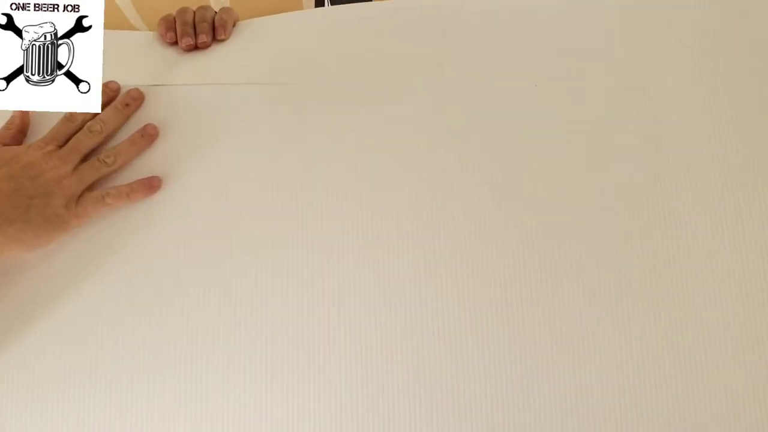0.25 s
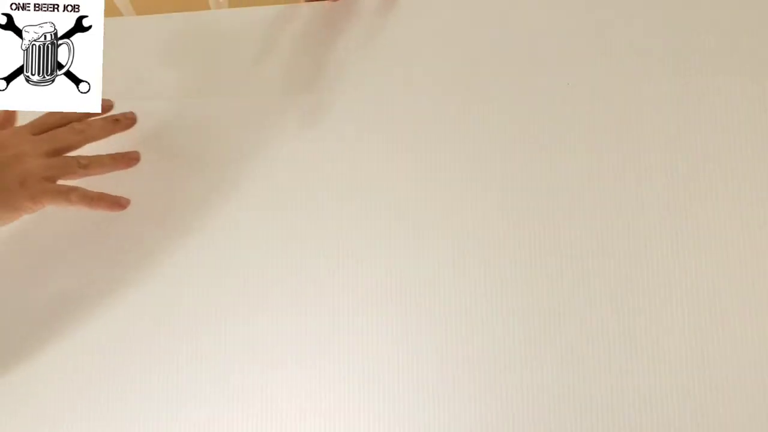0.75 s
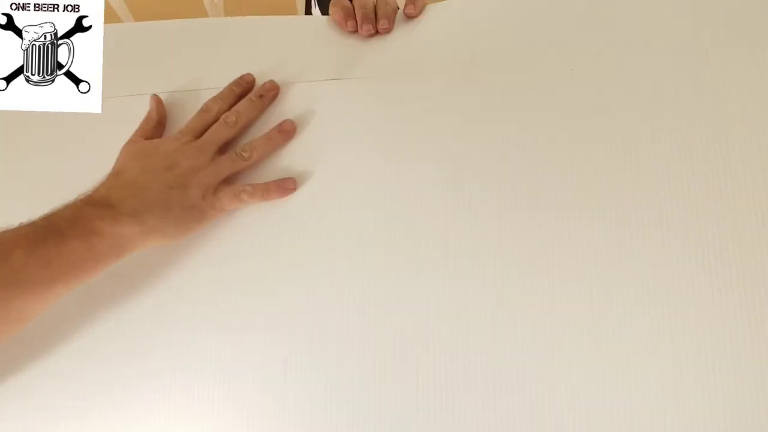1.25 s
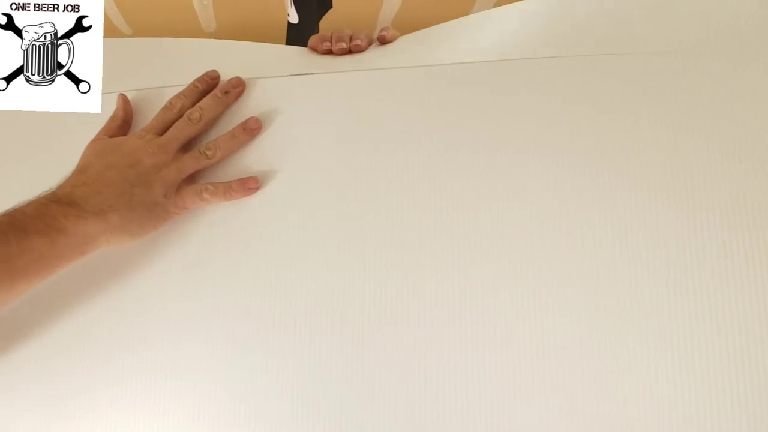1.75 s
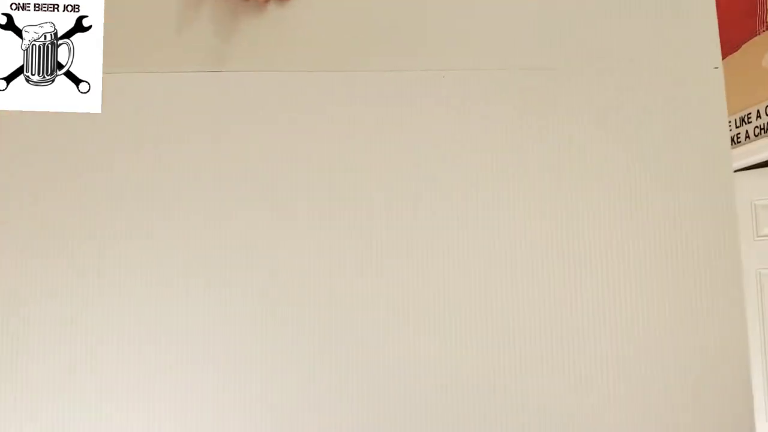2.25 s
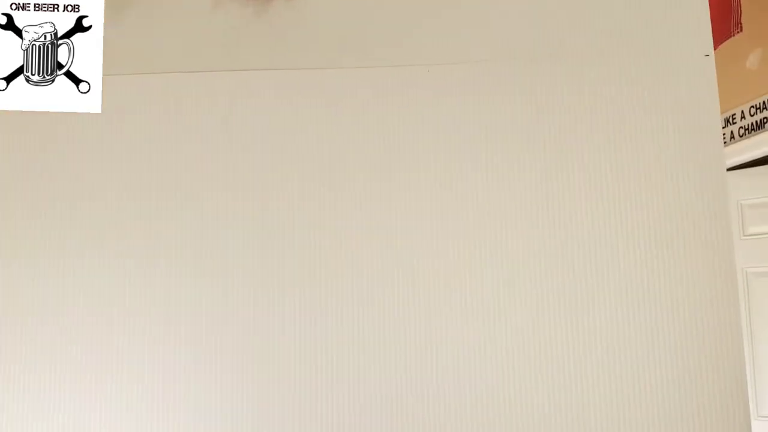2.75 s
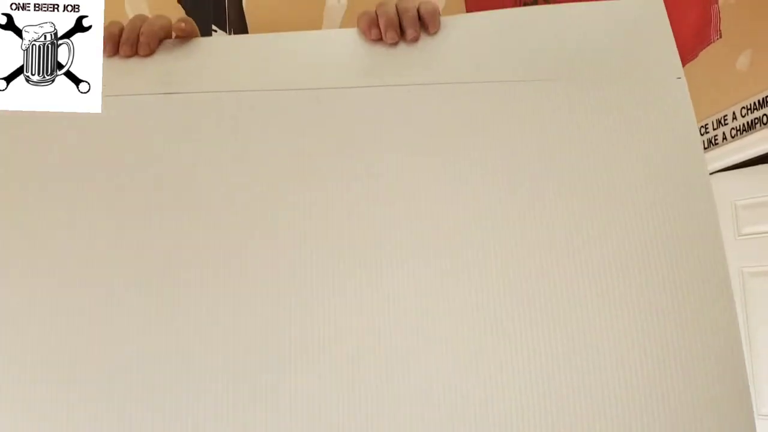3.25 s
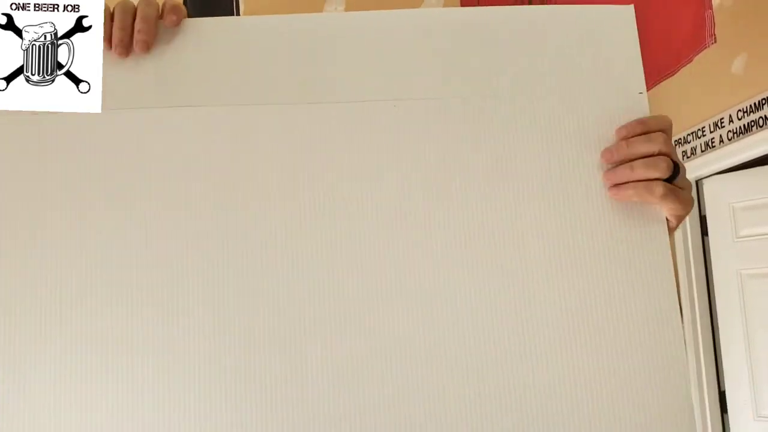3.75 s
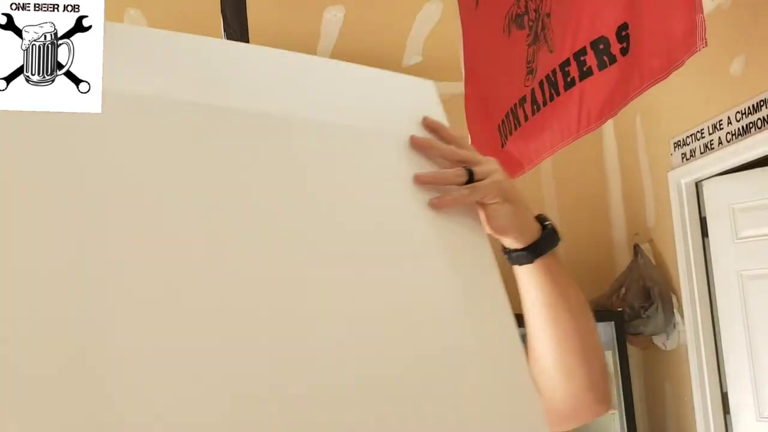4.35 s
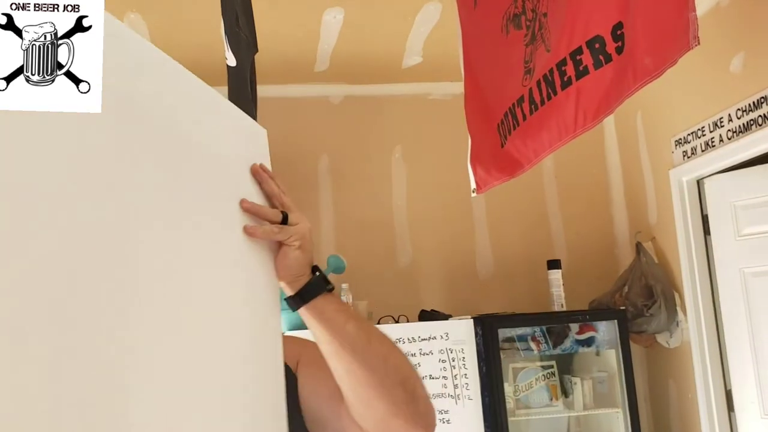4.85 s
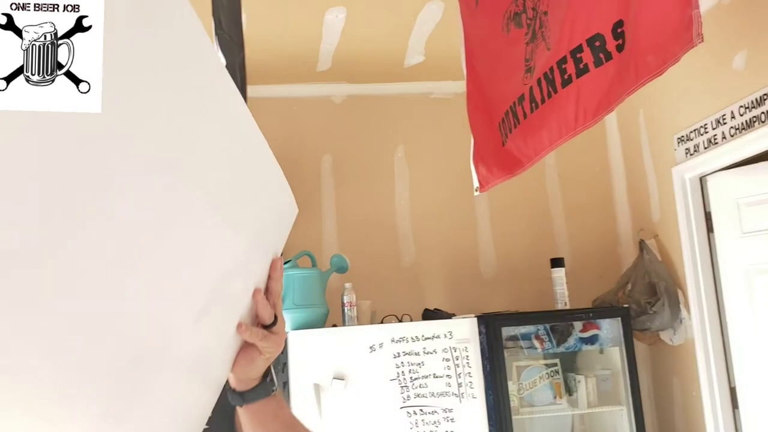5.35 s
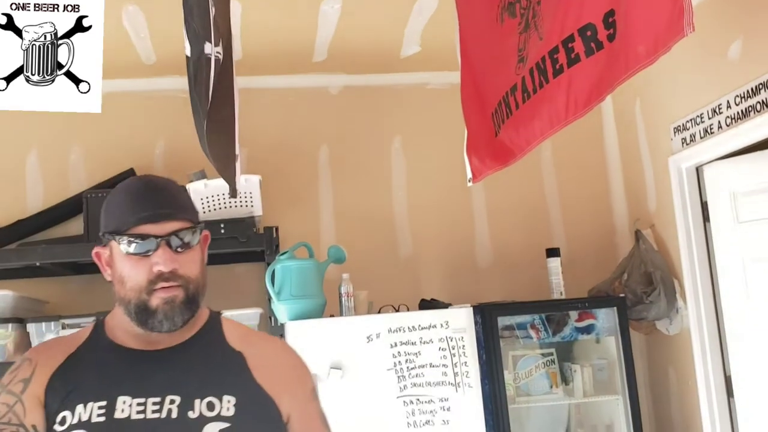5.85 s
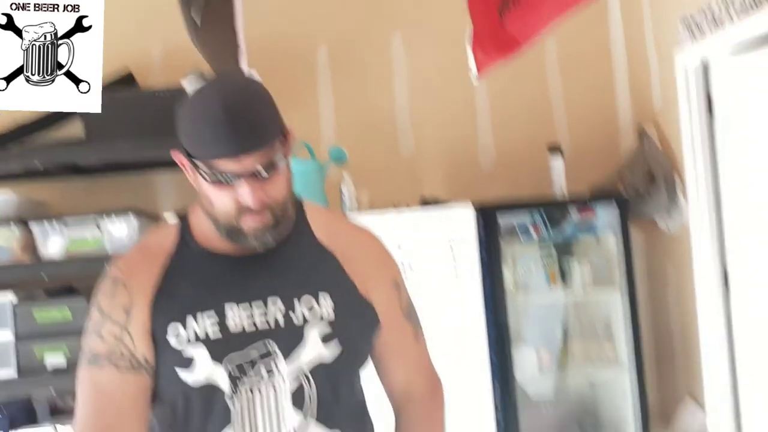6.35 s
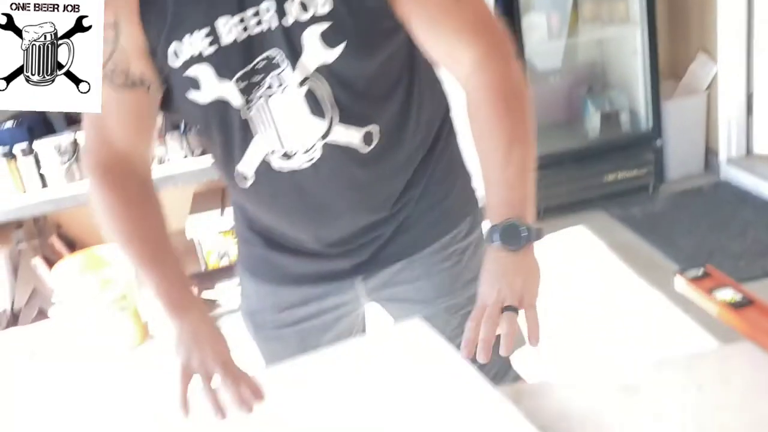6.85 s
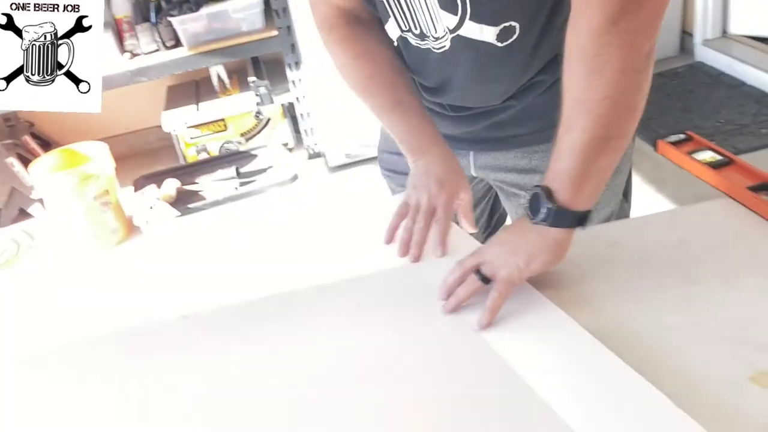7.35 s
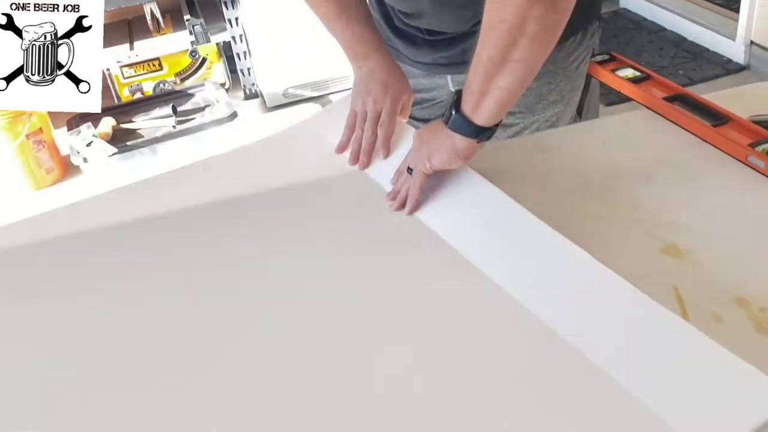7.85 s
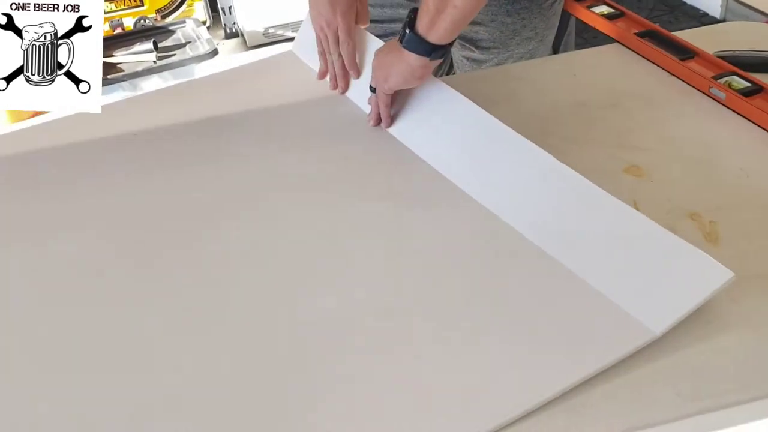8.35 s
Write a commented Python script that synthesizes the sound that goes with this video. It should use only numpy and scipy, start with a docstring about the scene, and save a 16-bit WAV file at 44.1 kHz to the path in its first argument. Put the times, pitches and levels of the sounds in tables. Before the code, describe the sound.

A large corrugated plastic sheet drums, crackles and hisses under hands, scrapes down onto a table, then creaks and snaps along a fold.

```python
"""A garage, a fridge humming; a little left of a stereo microphone, hands lift a corrugated plastic sheet.
It sways, drums and crackles as it bends; skin hisses over its ribs, with thumps, knocks, ticks, squeaks.
At 5.2 s its edge rasps across a table and it flops down; hands slide over it again, with two soft steps.
Near 8 s a scored fold creaks as flute after flute gives way, and at 8.3 s it snaps open:
near surfaces echo, sheet and room modes boom, and the garage reverberates."""
import sys
import numpy as np
from scipy import signal
from scipy.fft import rfft, irfft, next_fast_len
from scipy.io import wavfile
from scipy.ndimage import map_coordinates

SR = 44100
rng = np.random.default_rng(int(sys.argv[2]) if len(sys.argv) > 2 else 0)


def put_to_file(sound):
    """Save the sound as 16-bit audio at rate SR, in the file named by the first command-line argument."""
    columns = np.atleast_2d(sound).T  # one column per channel
    safe = np.clip(columns, -1, 1)
    whole_steps = np.round(safe * 32767)
    wavfile.write(sys.argv[1], SR, whole_steps.astype(np.int16))


N = 378495
T = np.arange(N) / SR

# The garage's reverberation. Each row: frequency in Hz, t60 in seconds.
GARAGE_DECAY = [(100, 0.64), (500, 0.53), (1500, 0.49), (4000, 0.44), (8000, 0.29), (14000, 0.24)]
# Diffuse sound at the microphone. Each row: frequency in Hz, left-right correlation.
STEREO_LIKENESS = [(120, .98), (280, 0.92), (500, 0.75), (1000, -0.083), (2000, -0.1), (12000, -0.11)]
# Room tone. Each row: frequency in Hz, level in dB.
AIR_SPECTRUM = [(15, -60), (25, -26), (50, -5.5), (116, -3), (204, -7.5), (281, -2), (495, -20), (762, -17),
                (1020, -28), (1950, -28.5), (3930, -51), (6730, -38.5), (7500, -45), (8350, -50),
                (11800, -47.5), (15500, -48)]
# Where the room tone lies. Each row: frequency in Hz, left over right in dB.
AIR_LEFT = [(800, 1), (1500, 0), (2300, 20), (4000, 14), (9000, 2)]
# The fridge's steady tones. Each row: frequency in Hz, level in dB.
FRIDGE_TONES = [(120, -57.5), (267, -58), (303, -61.5), (404, -68.5), (758, -72)]

# Bends of the sheet. Each row: start, rise and hold in seconds, then sway, drumming and crackle in dB.
BENDS = [(.02, 0.02, 0.0099, -44.5, -46, -57.5), (.428, 0.021, 0.018, -33.5, -31.5, -31.5),
         (.505, 0.025, 0.034, -32, -48, -45), (.585, 0.014, 0.018, -40, -34.5, -40.5),
         (.7, .03, 0.044, -54, -53, -54.5), (.9, 0.13, 0.054, -38.5, -49.5, -62),
         (1.055, .025, 0.065, -50, -40, -42.5), (1.15, 0.011, 0.085, -41, -35, -42),
         (1.362, 0.0037, 0.01, -49, -40, -51), (1.805, 0.02, 0.09, -53, -42.5, -63),
         (1.95, 0.022, 0.027, -45.5, -51, -70), (2.03, 0.033, 0.022, -36.5, -38, -45.5),
         (2.215, 0.033, 0.022, -32.5, -36, -35.5), (2.32, 0.016, 0.13, -44, -41.5, -50),
         (2.465, 0.023, 0.07, -35.5, -37.5, -41.5), (2.58, 0.015, 0.086, -42, -44, -50),
         (2.72, 0.029, 0.026, -41, -49, -60), (2.83, 0.035, 0.18, -37, -45.5, -58),
         (3.05, 0.021, 0.19, -46, -56, -57.5), (3.24, 0.012, .03, -39.5, -42.5, -52.5),
         (3.318, 0.012, 0.032, -45, -35, -49), (3.36, 0.031, 0.016, -37, -34, -39.5),
         (3.457, 0.0063, 0.01, -37.5, -36.5, -35), (3.598, 0.011, 0.041, -35, -39, -40),
         (3.75, 0.034, 0.017, -46, -43, -46), (4.44, 0.039, 0.051, -51, -49.5, -57.5),
         (4.755, 0.0081, 0.022, -62, -45, -51.5), (4.83, 0.028, 0.026, -72, -44.5, -48),
         (5.03, 0.032, 0.073, -49, -47, -58), (6.2, 0.056, 0.098, -61, -49, -53.5),
         (6.55, 0.087, 0.03, -45, -45.5, -43.5), (6.88, 0.088, 0.82, -58.5, -58, -60),
         (7.692, 0.0034, 0.0075, -43.5, -46, -42), (7.79, .02, 0.016, -42, -49, -58),
         (7.92, 0.13, 0.027, -45.5, -42, -47)]
# Resonances of the swaying sheet. Each row: frequency in Hz, width in Hz, gain in dB.
SHEET_MODES = [(51.4, 6.8, -3.5), (75, 15, -10), (124, 30.6, 3), (137.2, 32, 3), (175.8, 8.9, -3)]
# The drumming skin and the crackling flutes. Each row: frequency in Hz, gain in dB.
DRUM_SPECTRUM = [(100, -42), (170, -6), (260, 1), (330, -3), (450, -1.5), (600, -9.5), (850, -14.5),
                 (1400, -22), (4000, -108)]
CRACKLE_SPECTRUM = [(400, -7.5), (800, 2.5), (1300, 0), (1800, 0), (2300, 0.5), (3000, -8), (4500, -12.5),
                    (9000, -24)]
# Hands sliding over the ribs. Each row: start, rise and hold in seconds, then hiss and fizz in dB.
HAND_SLIDES = [(.02, 0.027, 0.012, -55.5, -58), (.342, 0.018, 0.035, -79, -64),
               (.42, 0.045, 0.036, -47.5, -45), (.505, 0.012, 0.01, -43, -44), (.58, .03, 0.077, -65, -53),
               (.7, 0.068, 0.096, -64, -57), (.995, 0.022, 0.06, -66, -57),
               (1.067, .025, 0.024, -42.5, -51), (1.14, 0.085, 0.071, -59.5, -64),
               (1.55, 0.019, 0.098, -71.5, -74), (1.67, .06, 0.021, -71, -62.5), (1.83, .03, .08, -82, -77),
               (1.98, 0.034, .03, -81, -58), (2.04, 0.019, 0.025, -53.5, -58),
               (2.21, 0.033, 0.013, -43, -47), (2.32, 0.022, .08, -65, -58),
               (2.46, 0.013, 0.0074, -45, -38.5), (2.53, 0.035, 0.027, -55, -66),
               (2.69, 0.052, 0.062, -51.5, -52), (2.87, 0.065, 0.18, -48, -47),
               (3.31, 0.11, 0.022, -54, -51), (3.455, 0.0069, 0.009, -61, -44),
               (3.52, 0.035, 0.066, -61, -52), (3.595, 0.0094, 0.01, -39, -40),
               (3.752, 0.021, 0.02, -51, -42.5), (3.972, .006, .01, -66, -72), (4.04, 0.02, 0.19, -78, -62),
               (4.214, .01, .004, -63, -59), (4.29, 0.053, 0.036, -57, -52.5),
               (4.498, 0.0046, 0.03, -63, -59), (4.55, .03, 0.046, -60.5, -75),
               (4.757, 0.012, 0.032, -52.5, -53), (4.83, 0.021, 0.031, -51.5, -49),
               (5.02, 0.19, 0.11, -54.5, -53.5), (6.08, 0.074, 0.062, -63, -63),
               (6.22, 0.054, 0.11, -57, -59), (6.42, 0.025, 0.077, -44, -59), (6.55, 0.15, 0.028, -61, -57),
               (6.83, 0.02, 0.059, -64, -72), (6.95, 0.043, 0.018, -66, -64), (7.1, .05, 0.14, -60, -78),
               (7.27, 0.014, 0.018, -53, -68), (7.355, 0.082, 0.022, -41.5, -45),
               (7.66, 0.026, 0.025, -56, -70), (7.94, 0.14, 0.018, -56.5, -69)]
# Strokes of a palm. Each row: start, rise and hold in seconds, level in dB.
PALM_STROKES = [(.745, 0.013, 0.024, -51.5), (1.55, .02, 0.14, -90), (3.03, 0.081, .015, -44.5),
                (6.425, .025, .03, -48.5), (6.95, .05, .3, -70), (7.355, 0.055, 0.077, -40.5)]
# Friction on the ribs: hiss, fine fizz and a palm's rub. Each row: frequency in Hz, gain in dB.
HISS_SPECTRUM = [(1200, -3), (2500, -2.5), (3500, 1), (5000, -1), (7000, 1.5), (9000, -2), (12000, -8.5)]
FIZZ_SPECTRUM = [(6000, -6), (8500, -1), (11000, -1), (15500, -4.5)]
PALM_SPECTRUM = [(600, -7), (900, 0), (1600, -8), (2600, -4.5), (3500, 2.5), (4200, -4.5), (5500, -9),
                 (10000, -50)]

# Deep, soft bumps of the sheet, and footsteps on the floor.
# Each row: start in seconds, level in dB, pitch in Hz.
BUMPS_AND_STEPS = [(.045, -35.5, 70), (0.552, -35, 50), (1.051, -34.5, 62), (2.486, -33, 60),
                   (2.6, -34, 59), (6.659, -43, 56.4), (6.993, -43.5, 51)]
# The sheet flops, patches of it buckle, fingers and edges tick.
# Each row: start in seconds, level in dB, pitch in Hz.
FLOPS = [(0.436, -21.5, 298), (2.229, -26.5, 431), (2.476, -23.5, 79.5), (2.545, -18.5, 136),
         (2.85, -25, 93), (3.319, -29, 151), (3.389, -29, 267), (3.416, -32, 311), (5.246, -25.5, 129),
         (5.445, -23, 294), (5.541, -14, 131), (5.554, -22.5, 390), (7.694, -29, 392)]
BUCKLES = [(.434, -35, 640), (0.454, -29, 580), (.525, -33, 625), (.596, -27, 616), (1.07, -35, 675),
           (1.155, -44, 794), (1.27, -38, 594), (1.362, -37, 820), (1.41, -46, 547), (1.809, -37, 565),
           (2.003, -32.5, 595), (2.04, -30, 600), (2.095, -26, 544), (2.22, -23.5, 563), (3.32, -33, 574),
           (3.371, -35, 555), (3.399, -25.5, 780), (3.456, -24, 610), (3.974, -36, 730),
           (4.043, -39.5, 715), (4.221, -36, 670), (4.499, -34, 674), (4.56, -35, 630), (4.604, -34, 670),
           (4.643, -36, 815), (4.684, -35.5, 810), (4.769, -31.5, 723), (4.845, -29, 600),
           (4.909, -31.5, 790), (4.943, -44, 630), (5.011, -35, 716), (5.09, -35, 840), (7.698, -27.5, 612),
           (7.919, -31, 626)]
FINGER_TICKS = [(0.4445, -22, 1870), (0.4578, -22, 1800), (.527, -30, 2310), (1.0705, -40, 2390),
                (1.1549, -31, 1440), (1.361, -38.5, 1600), (1.41, -41, 1450), (2.4776, -25.5, 1880),
                (3.3204, -34, 1440), (3.456, -29, 1830), (3.469, -22, 1930), (3.7934, -30, 5000),
                (4.2242, -25.5, 12100), (4.502, -27, 3600), (4.764, -26, 6240), (4.9432, -39.5, 1980),
                (5.013, -37, 2320), (5.0534, -35, 1930), (5.0916, -35.5, 1440), (5.1262, -36, 1840),
                (5.1505, -35, 1970)]
# A fingertip on the twin-walled plastic. Each row: frequency in Hz, gain in dB.
FINGER_SPECTRUM = [(300, -30), (1000, 8), (2400, 0.5), (4000, -3), (7000, -4.5), (15000, -9)]
# Squeaking slips. Each row: start in seconds, level in dB, pitch and width in Hz, t60 in seconds.
GRIP_SLIPS = [(2.09, -53, 2000, 300, 0.68), (3.458, -42, 2250, 1200, 0.16), (3.630, -37.5, 2430, 420, 0.47),
              (4.502, -57, 4400, 1820, 0.82), (5.203, -32, 2100, 300, 0.75), (6.64, -44, 1880, 700, .25)]

# One long drag over the table. Each row: time in seconds, then rasp, hiss and drumming in dB.
EDGE_DRAG = [(5.189, -53, -54, -52), (5.208, -36, -30.5, -46), (5.265, -25.5, -30.5, -42.5),
             (5.39, -34, -50.5, -38), (5.458, -33.5, -48.5, -35), (5.52, -32, -42, -44),
             (5.548, -31.5, -35.5, -29), (5.616, -38.5, -49.5, -36), (5.675, -32.5, -49, -38),
             (5.735, -40, -53, -42.5), (5.91, -37, -45, -46.5), (5.99, -34.5, -38.5, -46),
             (6.082, -43.5, -57, -49), (6.202, -60.5, -69, -49.5)]
# The edge's rasp. Each row: frequency in Hz, gain in dB.
RASP_SPECTRUM = [(400, -11), (800, -1), (1400, 0), (1800, -4.5), (2400, -3), (3200, -8), (4500, -15.5),
                 (9000, -26)]
# Resonances of the scraping edge. Each row: frequency in Hz, width in Hz, gain in dB.
EDGE_MODES = [(1250, 97, -6), (1450, 70, -8), (2090, 680, 28), (2870, 80, -10)]

# Pressure on the fold. Each row: time in seconds, level of the creak in dB.
FOLD_PRESSURE = [(7.964, -30), (8.0, -32), (8.05, -26), (8.075, -29)]
# Echoes of the snap off near surfaces. Each row: delay in seconds, relative level in dB.
NEAR_ECHOES = [(.0016, -10), (.0069, -3), (0.009, -9), (0.0105, -17), (0.022, -12), (.0287, -9),
               (0.0352, -28)]
# Low ringing of sheet and room after the snap. Each row: frequency in Hz, level in dB, t60 in seconds.
BOOM_MODES = [(57.3, -34, 0.31), (123.7, -31, 0.64), (135.7, -16, 0.24), (209, -32, 0.31),
              (268, -29.5, 0.25), (312, -29, 0.29), (361, -33, 0.4)]
# The snap's reverberation. Each row: frequency in Hz, gain in dB.
SNAP_TAIL_SPECTRUM = [(60, -22), (200, -5.5), (450, -8), (700, -1.5), (880, -8.5), (1280, 0.5),
                      (1900, -6.5), (2800, -12), (4500, -19), (7000, -15), (11000, -15), (15500, -21)]

# The scene lies a little left, and the right microphone dips near 6.5-7.4 kHz.
# Each row: frequency in Hz, left over right in dB.
CHANNEL_BALANCE = [(100, 0.9), (500, 2), (2000, 4), (4500, 4), (5700, 3), (6500, 11), (7400, 11), (8500, 5),
                   (12000, 3)]
# The microphone's colour. Each row: frequency in Hz, gain in dB.
MIC_RESPONSE = [(500, -0.5), (2000, 0), (7200, 1.3), (8300, -12.5), (9300, -9.5), (11500, -0.8),
                (15000, 3.7)]


def amp(db):
    """Decibels to gain."""
    return 10 ** (np.asarray(db) / 20)


def along(points, hz):
    """Read (Hz, value) points on a log frequency axis."""
    freqs, values = np.transpose(points)
    return np.interp(np.log(hz + 1), np.log(freqs), values)


def filtered(x, response):
    """Filter x by a response given as a function of frequency."""
    n = x.shape[-1]
    padded = next_fast_len(n + SR // 2)
    return irfft(rfft(x, padded) * response(np.fft.rfftfreq(padded, 1 / SR)), padded)[..., :n]


def colour(x, spectrum):
    """Shape x by (Hz, dB) points."""
    return filtered(x, lambda hz: amp(along(spectrum, hz)))


def resonate(x, modes):
    """Pass x through parallel (Hz, width, dB) resonances of alternating sign."""
    def response(hz):
        return sum((-1) ** k * amp(db) * 1j * hz * width / (centre ** 2 - hz ** 2 + 1j * hz * width)
                   for k, (centre, width, db) in enumerate(modes))
    return filtered(x, response)


def unit(x):
    """Scale to rms 1."""
    return x / np.sqrt(np.mean(x ** 2) + 1e-20)


def add(track, start, sound):
    """Mix a sound into a track from start seconds on."""
    part = track[..., round(start * SR):][..., :sound.shape[-1]]
    part += sound[..., :part.shape[-1]]


def wobble(rate):
    """A smooth random curve, rate knots a second."""
    return map_coordinates(rng.standard_normal(int(T[-1] * rate) + 4), [T * rate])


def pan(pair, lean):
    """Tilt a stereo pair to the left by (Hz, dB) points, keeping its power."""
    def response(hz):
        ratio = amp(along(lean, hz))
        return np.array([ratio, np.ones_like(ratio)]) * np.sqrt(2 / (1 + ratio ** 2))
    return filtered(pair, response)


def diffuse(pair):
    """Two unrelated signals become a sound field, alike on both sides in the bass only."""
    def response(hz):
        angle = np.arccos(np.clip(along(STEREO_LIKENESS, hz), -1, 1)) / 2
        return np.array([np.cos(angle), np.sin(angle)])
    mid, side = filtered(pair, response)
    return np.array([mid + side, mid - side])


def noise(samples=N):
    """Noise reaching the microphone from all around."""
    return diffuse(rng.standard_normal((2, samples)))


def garage_tail():
    """Stereo reverberation of energy 1 a side; each frequency dies at its own speed."""
    hz, t, bands = signal.stft(rng.standard_normal((2, SR // 2)), SR, nperseg=256)
    decay = amp(-60 * t / along(GARAGE_DECAY, hz)[:, None])
    tail = diffuse(signal.istft(bands * decay, SR, nperseg=256)[1])
    tail *= 1 - np.exp(-(np.arange(tail.shape[1]) / SR / 0.0032) ** 2)
    return tail / np.sqrt(np.sum(tail ** 2) / 2)


def room(x, wet_db):
    """Direct sound plus the garage at constant power; more wet_db sounds further from the microphone."""
    wet = amp(wet_db)
    reverb = signal.fftconvolve(x[None], garage_tail(), axes=1)[:, :len(x)]
    return (x + wet * reverb) / np.hypot(1, wet)


def grains(rate, spread_db):
    """Tiny random slips of uneven size, rate a second."""
    slipping = rng.random(N) < rate / SR
    size = amp(spread_db * np.clip(rng.standard_normal(N), -2, 2))
    return slipping * size * rng.choice([-1, 1], N)


def rub(spectrum, rate, spread_db, wet_db, gain=1):
    """Friction grains, coloured by the plastic and blurred by the room, at rms 1."""
    return unit(room(colour(gain * grains(rate, spread_db), spectrum), wet_db))


def gestures(rows, t60s, onset_db=12.5, lead_s=0.2):
    """Movements swell from a faint lead-in, hold and die away; one gain curve per level column."""
    power = np.zeros((len(t60s), N))
    t60 = np.array(t60s)[:, None]
    for start, rise, hold, *levels in rows:
        first = max(start - lead_s, 0)
        t = np.arange(SR) / SR + first - start
        swell_db = -onset_db * np.minimum(t / rise - 1, 0) ** 2
        fade_db = -60 * np.maximum(t - rise - hold, 0) / t60
        add(power, first, amp(np.array(levels)[:, None] + swell_db + fade_db) ** 2)
    return np.sqrt(power)


def drag_gains():
    """Gains of rasp, hiss and drumming while the edge is dragged, zero outside the drag."""
    times, *levels = np.transpose(EDGE_DRAG)
    return [amp(np.interp(T, times, db, -np.inf, -np.inf)) for db in levels]


def room_tone():
    """The garage's quiet air, its faint hiss off to the left."""
    return amp(-49.5) * pan(unit(colour(noise(), AIR_SPECTRUM)), AIR_LEFT)


def fridge():
    """The fridge hums throughout, each tone wavering in level and phase."""
    hum = np.zeros(N)
    for hz, db in FRIDGE_TONES:
        peak = np.sqrt(2) * amp(db + 1.8 * wobble(8))
        hum += peak * np.sin(2 * np.pi * hz * T + 1.55 * wobble(9.7))
    return hum


def bending():
    """Bent or dragged, the sheet sways in its lowest modes and drums; bends also crackle its flutes."""
    bass_band = [(20, -42), (45, -3.5), (190, 0.5), (400, -32)]
    sway = unit(colour(resonate(noise(), SHEET_MODES), bass_band))
    fits = amp(3.2 * wobble(32))  # the sheet gives way in fits and starts
    drum = rub(DRUM_SPECTRUM, rate=300, spread_db=3, wet_db=-1.5, gain=fits)
    crackle = rub(CRACKLE_SPECTRUM, rate=400, spread_db=6.5, wet_db=6, gain=fits)
    swaying, drumming, crackling = gestures(BENDS, t60s=[0.62, 0.47, 0.37])
    _, _, dragged = drag_gains()
    return (sway * np.hypot(swaying, amp(-5.5) * dragged)
            + drum * np.hypot(drumming, dragged)
            + crackle * crackling)


def hands():
    """Skin hisses and fizzes over the ribs; a palm stroke sings more narrowly."""
    hiss = rub(HISS_SPECTRUM, rate=3000, spread_db=-2, wet_db=12.5)
    fizz = rub(FIZZ_SPECTRUM, rate=2900, spread_db=7, wet_db=7.5)
    palm = rub(PALM_SPECTRUM, rate=4600, spread_db=3.5, wet_db=8.5)
    hissing, fizzing = gestures(HAND_SLIDES, t60s=[0.4, 0.31])
    return hiss * hissing + fizz * fizzing + palm * gestures(PALM_STROKES, t60s=[0.43])


def thumps():
    """Deep bumps of the sheet and footsteps swell softly; a flop swings the sheet more abruptly."""
    out, t = np.zeros(N), np.arange(SR // 3) / SR
    swell = t / 0.015 * np.exp(1 - t / 0.015)
    for start, db, hz in BUMPS_AND_STEPS:
        add(out, start, amp(db) * swell * np.sin(2 * np.pi * hz * t))
    push = amp(-60 * t / 0.13) * (1 - np.exp(-t / 0.0028))
    for start, db, hz in FLOPS:
        add(out, start, amp(db) * push * np.sin(2 * np.pi * hz * t))
    return room(out, wet_db=-8.5)


def knocks():
    """A patch of the sheet flips over and rings hollowly in three partials."""
    out, t = np.zeros(N), np.arange(SR // 12) / SR
    partials = [(0.62, -10, 0.086), (1, 0, 0.024), (1.9, -7, 0.011)]
    attack = 1 - np.exp(-t / 0.00098)
    for start, db, hz in BUCKLES:
        ring = sum(amp(level_db - 60 * t / t60) * np.sin(2 * np.pi * ratio * hz * t)
                   for ratio, level_db, t60 in partials)
        add(out, start, amp(db) * ring * attack)
    return room(out, wet_db=-4.5)


def ticks(t60=0.014):
    """Fingers and edges tick on the plastic, each contact with a broad resonance of its own."""
    out, t = np.zeros(N), np.arange(SR // 16) / SR
    for start, db, hz in FINGER_TICKS:
        burst = rng.standard_normal(len(t)) * amp(-60 * t / t60)
        click = resonate(burst, [(hz, 0.67 * hz, 0)])
        add(out, start, amp(db) * click / np.abs(click).max())
    return room(colour(out, FINGER_SPECTRUM), wet_db=-2.5)


def squeaks():
    """A slipping grip excites a resonance that dies away in the room."""
    out, t = np.zeros((2, N)), np.arange(SR // 2) / SR
    attack = 1 - np.exp(-t / 0.00074)
    for start, db, hz, width_hz, t60 in GRIP_SLIPS:
        mode = [(hz, width_hz, 0)]
        ring = unit(resonate(resonate(noise(len(t)), mode), mode))
        add(out, start, ring * amp(db - 60 * t / t60) * attack)
    return out


def scraping():
    """The sheet's edge rasps across the table, catching and freeing, and rings its flutes."""
    slips = grains(rate=1500, spread_db=2) * amp(5 * wobble(45))
    friction = unit(colour(slips, RASP_SPECTRUM))
    ring = amp(-3.5) * unit(resonate(slips, EDGE_MODES))
    rasp = unit(room(friction + ring, wet_db=8))
    hiss = rub(HISS_SPECTRUM, rate=3700, spread_db=-1.5, wet_db=13)
    fizz = amp(-5) * rub(FIZZ_SPECTRUM, rate=5400, spread_db=-7, wet_db=8)
    rasping, hissing, _ = drag_gains()
    return rasp * rasping + (hiss + fizz) * hissing


def pop(hz, cycles, crack_db):
    """One flute buckles with a sharp crack; its skin's swing peaks after the given cycles and dies."""
    t = np.arange(SR // 50) / SR
    age = t * hz / cycles
    swing = (age * np.exp(1 - age)) ** 3 * np.cos(2 * np.pi * hz * t)
    crack = amp(crack_db - 60 * t / 0.0053) * (1 - np.exp(-age)) * rng.standard_normal(len(t))
    return swing + crack


def creak(flutes_per_s=150, scatter_s=0.00147):
    """Flutes give way in turn as the fold is pressed; a lower, mostly weaker pop follows each."""
    out = np.zeros(N)
    times, levels = np.transpose(FOLD_PRESSURE)
    beats = np.arange(times[0], times[-1], 1 / flutes_per_s)
    for beat, (late, pitch, size, after_size) in zip(beats, rng.standard_normal((32, 4))):
        start = beat + scatter_s * late
        db = np.interp(beat, times, levels) + size
        hz = 1100 * np.exp(0.12 * pitch)
        add(out, start, amp(db) * pop(hz, cycles=1, crack_db=-21))
        add(out, start + 0.0039, amp(db - 5 + 2 * after_size) * pop(0.74 * hz, cycles=1.8, crack_db=-26))
    return room(out, wet_db=-5.5)


def snap(start=8.2822):
    """The fold breaks: one hard pop, its echoes off near surfaces, a low boom and the garage's tail."""
    out, t = np.zeros((2, N)), np.arange(SR // 2) / SR
    crack = pop(hz=1430, cycles=1.12, crack_db=-7)
    body = amp(-10) * pop(hz=620, cycles=0.94, crack_db=-30)
    add(out, start - 0.0002, amp([[-3.5], [-4]]) * (crack + body))
    for delay, db in NEAR_ECHOES:
        echo = amp(db - 6.5) * pop(hz=1337, cycles=1.4, crack_db=-28)
        right_lag = rng.uniform(-0.00043, 0.00026)
        add(out[0], start + delay, echo)
        add(out[1], start + delay + right_lag, echo)
    boom = sum(amp(db - 60 * t / t60) * np.sin(2 * np.pi * hz * t) for hz, db, t60 in BOOM_MODES)
    add(out, start + 0.00384, boom * (1 - np.exp(-t / 0.0022)))
    tail = colour(garage_tail(), SNAP_TAIL_SPECTRUM)
    add(out, start + 0.002, amp(15.5) * tail / np.linalg.norm(tail))
    return out


def scene():
    """The scene lies a little left, and the right microphone dips near 6.5-7.4 kHz."""
    handling = bending() + hands() + thumps() + knocks() + ticks() + squeaks() + scraping()
    return pan(room_tone() + fridge() + handling + creak() + snap(), CHANNEL_BALANCE)


def record(dry):
    """The microphone has a notch near 8.3 kHz and hears nothing above 15.85 kHz."""
    return filtered(colour(dry, MIC_RESPONSE), lambda hz: hz < 15850)


dry = scene()
out = record(dry)
put_to_file(out)
```